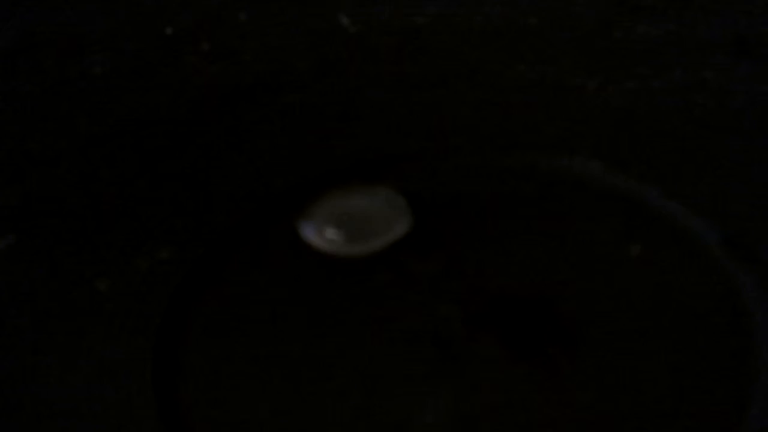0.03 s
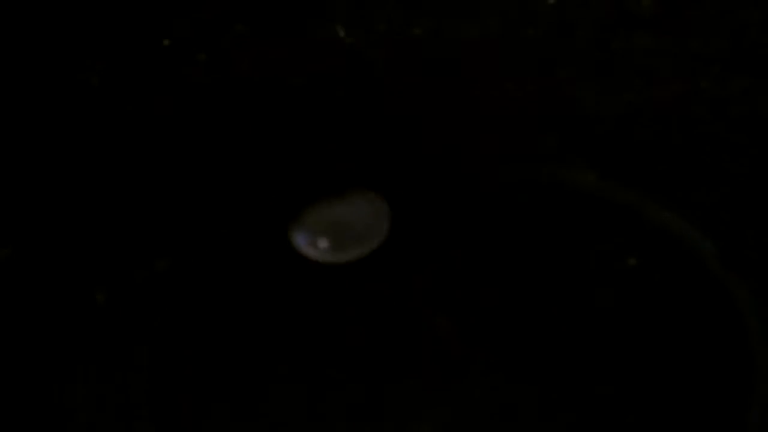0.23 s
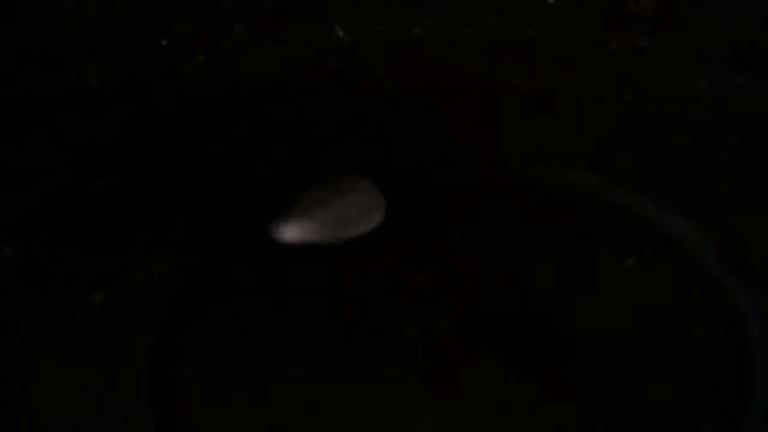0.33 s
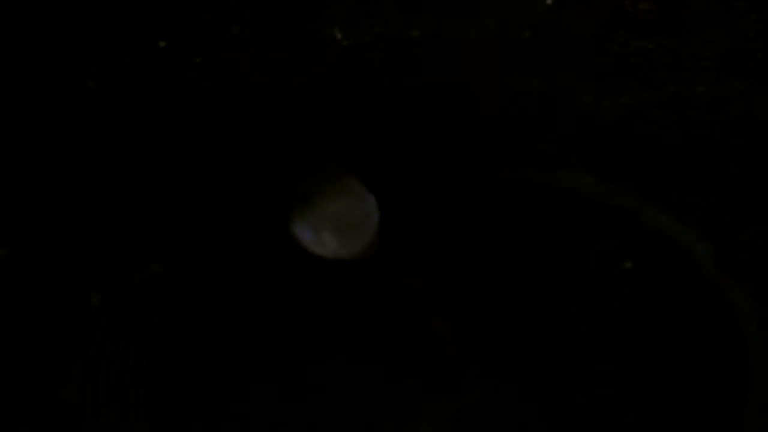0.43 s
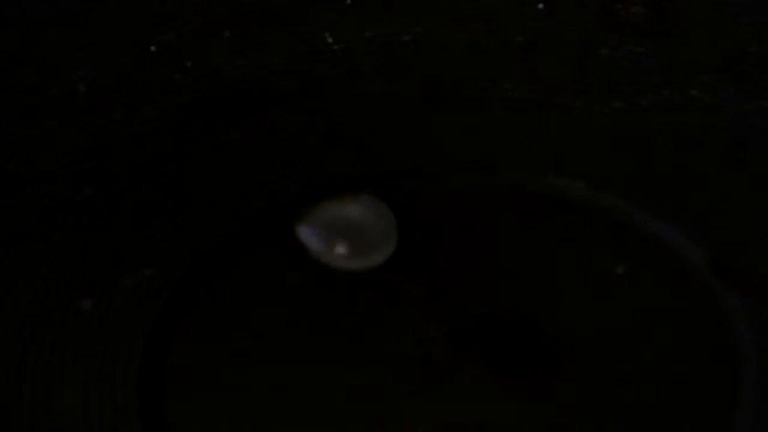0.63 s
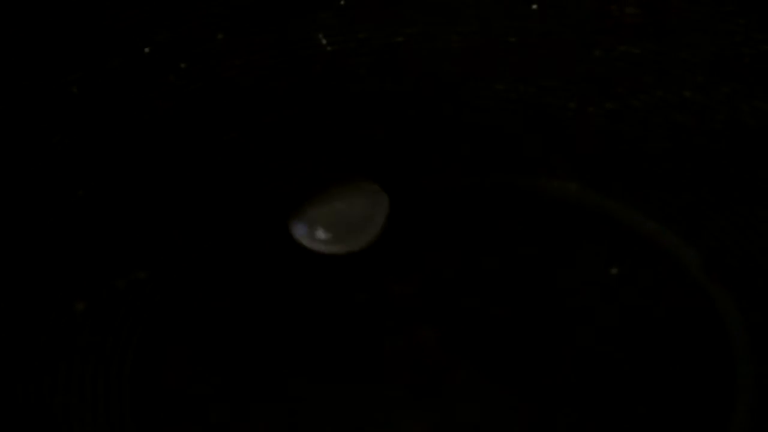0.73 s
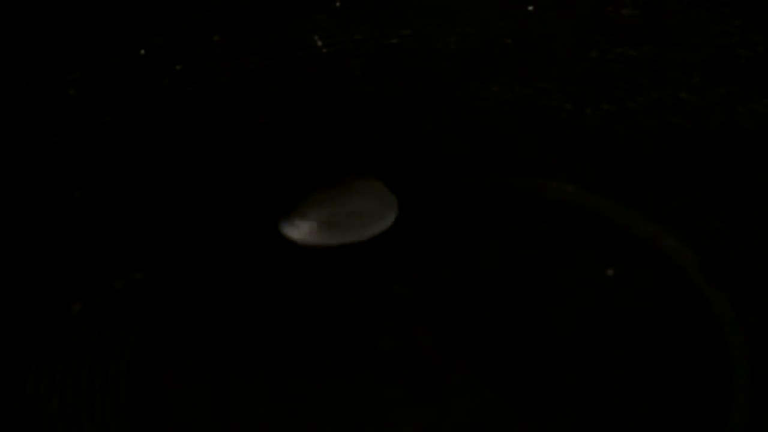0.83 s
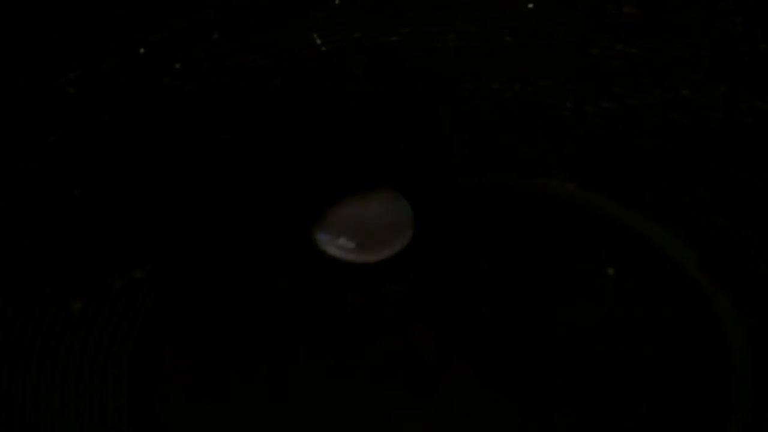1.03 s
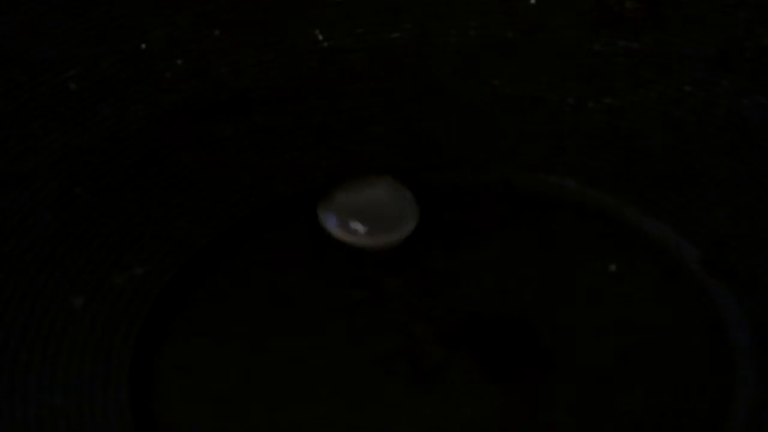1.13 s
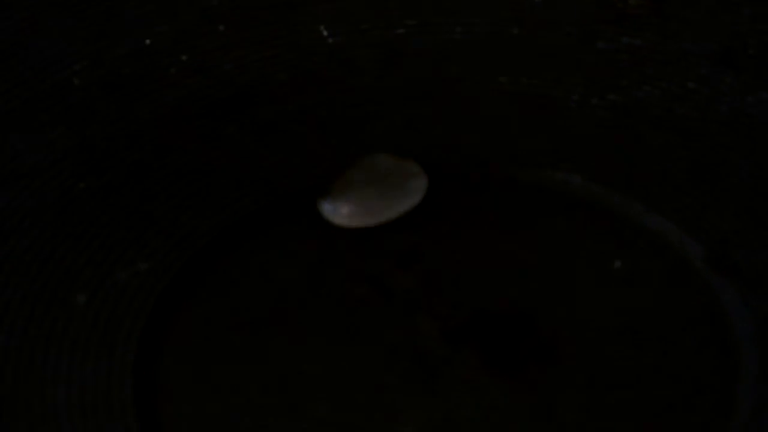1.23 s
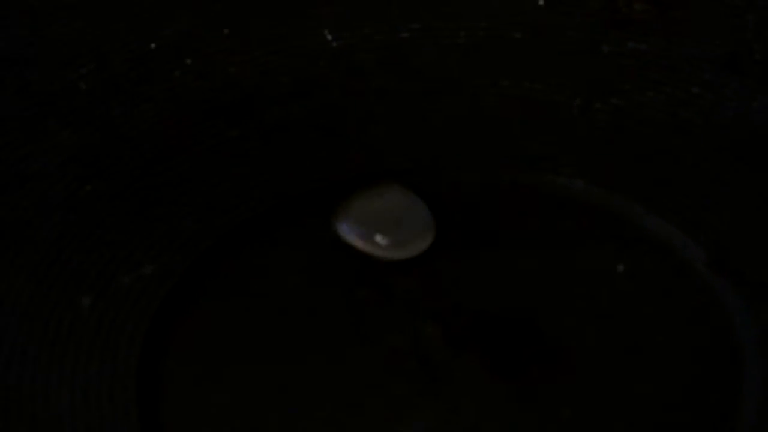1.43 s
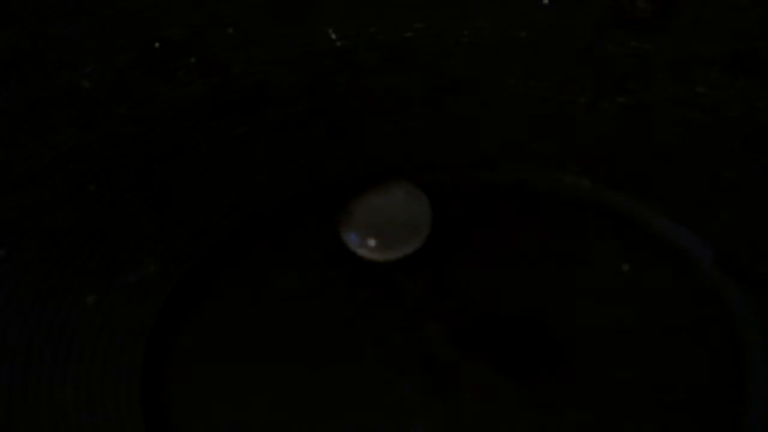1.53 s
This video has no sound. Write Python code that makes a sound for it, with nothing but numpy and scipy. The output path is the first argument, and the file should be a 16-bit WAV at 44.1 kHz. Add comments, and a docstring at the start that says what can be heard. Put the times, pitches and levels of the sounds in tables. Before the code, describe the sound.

A water drop sizzles faintly on a hot stove burner, over a quiet room's fan-like rush and hum. A sharp, close click comes first, just after 0.1 seconds, then four soft double thumps like a small mechanism, from 0.2 to 0.8 seconds. The thin, bright hiss comes in uneven spurts from about 0.3 seconds. The drop spits with one dull pop at 1.2 seconds and hisses on until 1.5.

```python
"""A quiet room with a hot stove, on a stereo pair of microphones. A fan-like rush and hum come in first
and stay in the background. Close to the microphones a sharp click rings a small housing, and four soft
double thumps follow, like a small mechanism that starts and stops. From the first thumps on, a water
drop skates on the burner, its steam hissing in spurts whenever it touches the metal. Late on it spits
once, with a dull pop, and hisses on."""
import sys
import numpy as np
from scipy import signal
from scipy.fft import rfft, irfft, next_fast_len
from scipy.io import wavfile
from scipy.ndimage import map_coordinates

SR = 44100
rng = np.random.default_rng(int(sys.argv[2]) if len(sys.argv) > 2 else 0)


def master_out(mix):
    """Clip the mix to full scale and print it as 16-bit PCM to the path in sys.argv[1]."""
    frames = np.transpose(np.atleast_2d(mix))
    ceiling = np.clip(frames, -1, 1)
    pcm = np.round(ceiling * 32767).astype(np.int16)
    wavfile.write(sys.argv[1], SR, pcm)


N = 70560

# steam while the drop touches the metal (start [s], end [s], level [dB], 20 dB rise [s], 20 dB fall [s])
STEAM_SPURTS = [(.28, .299, -58.3, .016, .012), (.349, .357, -62, .02, .02), (.378, .477, -61.7, .03, .05),
                (.502, .548, -60.7, .03, .05), (.575, .746, -57.2, .07, .028),
                (.771, .78, -60.5, .02, .012), (.868, .92, -58.2, .13, .03), (.936, .966, -54.3, .04, .052),
                (1.111, 1.16, -63, .03, .055), (1.222, 1.26, -55.2, .052, .03),
                (1.276, 1.356, -57.4, .03, .07), (1.376, 1.39, -65, .02, .015),
                (1.474, 1.514, -62, .036, .03)]
# steam at the drop's rim (frequency [Hz], relative density [dB])
HISS_SPECTRUM = [(3000, -31), (5000, -10), (7300, -6.5), (8000, 0.5), (9000, -0.5), (9800, -6),
                 (11300, -3.5), (12600, 1), (15500, -1.5)]
# the hiss across the microphones (frequency [Hz], left-right likeness [-1..1])
HISS_LIKENESS = [(4000, 0.44), (7000, 0.3), (8500, 1), (11000, 0.31), (14000, 0.82)]
# the lower sizzle of hard boiling (frequency [Hz], relative density [dB])
SIZZLE_SPECTRUM = [(900, -8.5), (1800, -8), (3200, -5), (4500, -7.5), (6500, -10), (9000, -24)]
# the drop's pop (frequency [Hz], relative density [dB])
SPIT_SPECTRUM = [(300, -7), (600, -3), (1100, -8), (1850, -4), (2300, -19), (3400, -8.5), (5000, -36)]

# the click snaps, then seats (delay [s], relative level [dB], t60 [s], left over right [dB])
CLICK_CRACKS = [(0, -11.5, 0.0081, -2), (.0028, -10, 0.01, 8)]
# the noise of each crack (frequency [Hz], relative density [dB])
CRACK_SPECTRUM = [(60, 6.5), (500, -4), (1200, 1), (3000, -2.5), (4200, -8.5), (7000, -6.5), (10000, -2.5),
                  (15500, -19)]
# the housing's main mode (frequency [Hz], relative level [dB], t60 [s], left [gain], right [gain])
ROCKING_MODE = [(737, 4.8, .037, .8, -1)]
# its other modes (frequency [Hz], relative level [dB], t60 [s], left [gain], right [gain])
HOUSING_MODES = [(330, 1.5, 0.0075, 0.66, -1), (572, 1, 0.021, 0.2, 0.82), (820, -16, 0.062, 0.68, 1),
                 (967, -2.5, 0.023, 0.068, 0.99), (1480, -11, 0.035, 0.11, -0.99),
                 (2190, 1.5, 0.008, 0.78, -0.56), (2775, -4.5, 0.013, 0.17, -1.09),
                 (3194, -11, 0.0197, 0.89, 0.18), (3304, -26, 0.093, 0.76, 0.72),
                 (6300, -9, 0.0046, .7, -0.83)]

# moves of the mechanism (time [s], level [dB])
MECHANISM_MOVES = [(.1956, -39.7), (.3174, -37.6), (.5416, -37.3), (.7342, -37.6)]
# knocks within a move (delay [s], relative level [dB], dullness [dB/octave], contact time [s])
MOVE_KNOCKS = [(0, -7.5, -1, .001), (.0022, -4.3, .5, .001), (.017, -15, -5, .001), (.0213, -12, -4, .001),
               (.0262, 10.5, 9, .0022)]
# the relaxed mechanism (frequency [Hz], relative level [dB], t60 [s], left [gain], right [gain])
MECHANISM_MODES = [(302, -14, 0.049, 0.96, 0.11), (396, 2, 0.052, 1, 0.52), (452, -1, 0.033, 0.8, 0.99),
                   (540, -28, 0.09, 0.55, 0.86), (850, -1.5, 0.027, 0.27, 1), (898, -3.5, 0.027, 1, 0.42),
                   (1420, 0.5, 0.03, 0.67, -1.3), (2130, -12, 0.029, 0.79, 1)]
# its rattle (frequency [Hz], relative density [dB])
RATTLE_SPECTRUM = [(300, -6), (700, 17.5), (1100, 8), (1700, 2), (2400, 1), (3400, -4), (5000, -26),
                   (10000, -40)]

# the room's rush (frequency [Hz], relative density [dB])
ROOM_SPECTRUM = [(25, -23), (60, -11), (110, -9), (170, -3.5), (260, -4), (450, -6), (800, -6.5),
                 (1250, -12), (2000, -13.5), (3000, -14.5), (4200, -18), (6500, -23), (8000, -26),
                 (15500, -36.5)]
# the rush across the microphones (frequency [Hz], left-right likeness [-1..1])
ROOM_LIKENESS = [(60, 0), (200, 0.044), (450, 0.24), (1500, 0.11), (5000, 0), (14000, 0)]
# lines of the hum (frequency [Hz], rms level [dB])
HUM_LINES = [(166, -71), (807, -72.5), (1065, -72)]
# swells of the low drone (time [s], rms level [dB])
LOW_DRONE_LEVELS = [(.07, -72.5), (.43, -61), (.6, -71), (.78, -56.5), (.86, -61), (.91, -77), (.97, -61.5),
                    (1.07, -63), (1.13, -76), (1.22, -56), (1.42, -82), (1.6, -58.5)]
# swells of the upper drone (time [s], rms level [dB])
HIGH_DRONE_LEVELS = [(.07, -69), (.27, -62), (.5, -64), (.75, -71), (.91, -64), (1.1, -73), (1.6, -68)]

TIME = np.arange(N) / SR
RING_TIME = np.arange(int(0.2 * SR)) / SR


def steam(simmer_db=-82, hard_boil_db=-58, flutter_db=1.06, growth_db_per_s=3):
    """On the burner: spurts of steam drive a bright fluttering hiss and a lower, slowly growing sizzle."""
    power = amp(simmer_db) ** 2
    for start, end, db, rise, fall in STEAM_SPURTS:
        outside = np.maximum((start - TIME) / rise, (TIME - end) / fall)
        power += amp(db - 20 * np.maximum(0, outside)) ** 2
    boil_db = 10 * np.log10(power)
    hiss_db = boil_db + 4.5 + flutter_db * wobble(150)
    hiss = amp(hiss_db) * rush([(1000, -60)] + HISS_SPECTRUM, HISS_LIKENESS)
    surge_db = 0.84 * (boil_db - hard_boil_db)  # the sizzle swings less than the hiss
    sizzle_db = hard_boil_db - 1.5 + surge_db + growth_db_per_s * (TIME - 1)
    sizzle = amp(sizzle_db) * rush(SIZZLE_SPECTRUM, likeness=[(3000, 0.66)])
    return hiss * pan(db=-0.1) + sizzle * pan(db=-0.5)


def spit():
    """One dull pop as the drop falls back on the metal."""
    return amp(-44.5) * dying(start=1.189, t60=0.055) * rush(SPIT_SPECTRUM, likeness=[(1000, 0.07)])


def click(start_s=0.1414):
    """Close up: a snap and its seating crack; the housing rocks the microphones against each other."""
    grit = rush(CRACK_SPECTRUM, likeness=[(1000, -0.11)])
    sound = sum(amp(db) * pan(pan_db) * dying(start_s + delay, t60) * grit
                for delay, db, t60, pan_db in CLICK_CRACKS)
    add(sound, ring(ROCKING_MODE + HOUSING_MODES), start_s)
    return amp(-17) * low_cut(sound, hz=162)


def thumps(pitch_lift=0.074, relax_s=0.026, rattle_t60=0.052):
    """Close up: each move of the mechanism knocks, rattles briefly and ends on a dull, lower stop."""
    knocks, rattle_power = np.zeros((2, N)), np.zeros(N)
    for delay, db, dull_db, contact_s in MOVE_KNOCKS:
        stretch = 1 + pitch_lift * max(0, 1 - delay / relax_s)  # rings higher as a move starts
        attack = 1 - np.exp(-RING_TIME / contact_s)
        knock = ring(MECHANISM_MODES, dull_db, stretch) * attack
        for start, move_db in MECHANISM_MOVES:
            strength = amp(move_db + db + rng.normal(0, 1.0))
            add(knocks, strength * knock, start + delay)
            shake = strength * amp(-2 * dull_db) * fading(rattle_t60)  # dull knocks rattle less
            add(rattle_power, shake ** 2, start + delay)
    rattle = amp(-4) * np.sqrt(rattle_power) * rush(RATTLE_SPECTRUM, likeness=[(1000, 0.48)])
    return low_cut(knocks + rattle, hz=296)  # small parts radiate little bass


def room(low_drone_hz=213.5, high_drone_hz=312.6, waver_db=1, waver_rad=0.4):
    """In the background: a steady rush with wavering lines of hum, two of which swell and fade."""
    drones = [(low_drone_hz, np.interp(TIME, *np.transpose(LOW_DRONE_LEVELS))),
              (high_drone_hz, np.interp(TIME, *np.transpose(HIGH_DRONE_LEVELS)))]
    hum = np.zeros(N)
    for hz, db in HUM_LINES + drones:
        peak = np.sqrt(2) * amp(db + waver_db * wobble(11.8))
        hum += peak * np.sin(2 * np.pi * hz * TIME + waver_rad * wobble(13.22))
    return amp(-52.5) * rush(ROOM_SPECTRUM, ROOM_LIKENESS) * pan(db=-1.4) + hum


def ring(modes, dull_db=0, stretch=1):
    """Struck modes as both microphones get them; a soft blow loses dull_db per octave."""
    sound = 0
    for hz, db, t60, left, right in modes:
        octaves = np.log2(hz / modes[0][0])
        tone = np.sin(2 * np.pi * hz * stretch * RING_TIME)
        sound += np.outer([left, right], amp(db - dull_db * octaves) * fading(t60) * tone)
    return sound


def rush(spectrum, likeness):
    """Coloured stereo noise of rms 1; likeness sets how well the two microphones agree."""
    def response(hz):
        width = np.arccos(np.clip(along(likeness, hz), -1, 1)) / 2
        return amp(along(spectrum, hz)) * [np.cos(width), np.sin(width)]
    mid, side = filtered(rng.standard_normal((2, N)), response)
    noise = np.array([mid + side, mid - side])
    return noise / np.sqrt(np.mean(noise ** 2))


def wobble(rate):
    """A smooth random curve, rate knots a second."""
    knots = rng.standard_normal(int(N * rate / SR) + 4)
    at = np.linspace(0, N * rate / SR, N // 40)
    return np.interp(TIME * rate, at, map_coordinates(knots, [at]))


def fading(t60):
    """A short envelope that falls 60 dB in t60 seconds."""
    return np.exp(-np.log(1000) * RING_TIME / t60)


def dying(start, t60):
    """An envelope that jumps up at start seconds and dies away."""
    envelope = np.zeros(N)
    add(envelope, fading(t60), start)
    return envelope


def add(track, sound, start):
    """Mix a short sound into a track at start seconds."""
    part = track[..., max(0, round(start * SR)):][..., :sound.shape[-1]]
    part += sound[..., :part.shape[-1]]


def amp(db):
    """Decibels to gain."""
    return 10 ** (np.asarray(db) / 20)


def pan(db):
    """Microphone gains, left louder than right by db."""
    return amp(np.array([[db], [-db]]) / 2)


def along(points, hz):
    """Interpolate (frequency, value) points on a log axis."""
    freqs, values = np.transpose(points)
    return np.interp(np.log(hz + 1), np.log(freqs + 1), values)


def filtered(x, response):
    """Shape x by a gain for each frequency."""
    size = next_fast_len(N + 4096, real=True)
    return irfft(rfft(x, size) * response(np.fft.rfftfreq(size, 1 / SR)), size)[..., :N]


def low_cut(x, hz):
    """Roll off the bass below hz."""
    return signal.sosfilt(signal.butter(2, hz, "highpass", fs=SR, output="sos"), x)


def scene():
    """Drop, mechanism and room as they reach the microphones."""
    return steam() + spit() + click() + thumps() + room()


def record(dry, start_s=0.072, fade_s=0.0027, top_hz=15850):
    """The microphones open after a moment of silence and pass nothing above the band limit."""
    opened = np.clip((TIME - start_s) / fade_s, 0, 1)
    return filtered(dry * opened, lambda hz: np.clip((top_hz - hz) / 100 + 0.5, 0, 1))


dry = scene()
out = record(dry)
master_out(out)
```